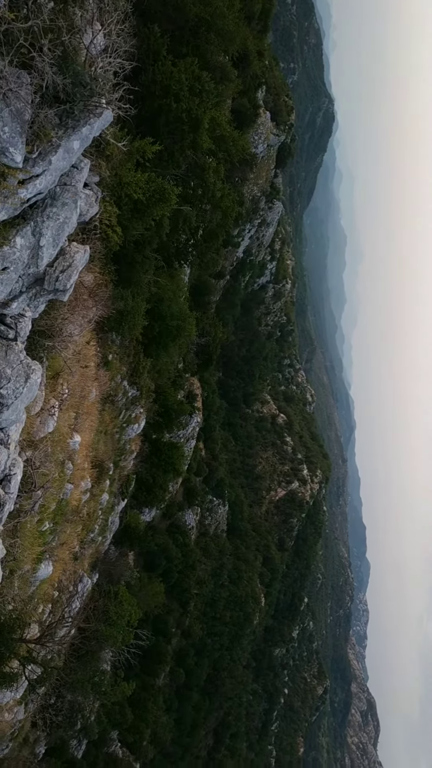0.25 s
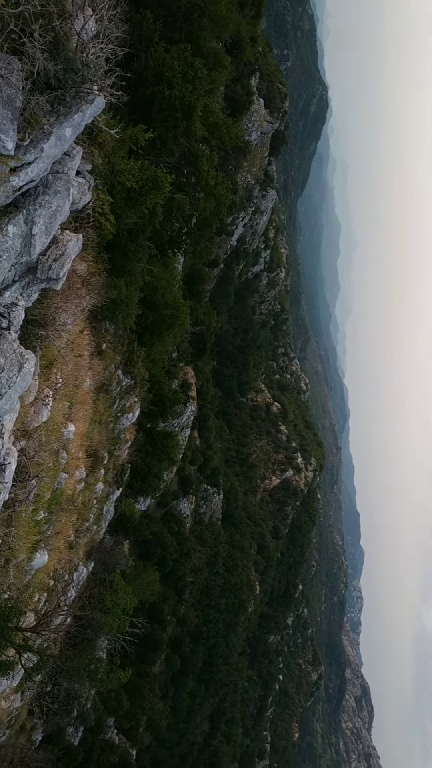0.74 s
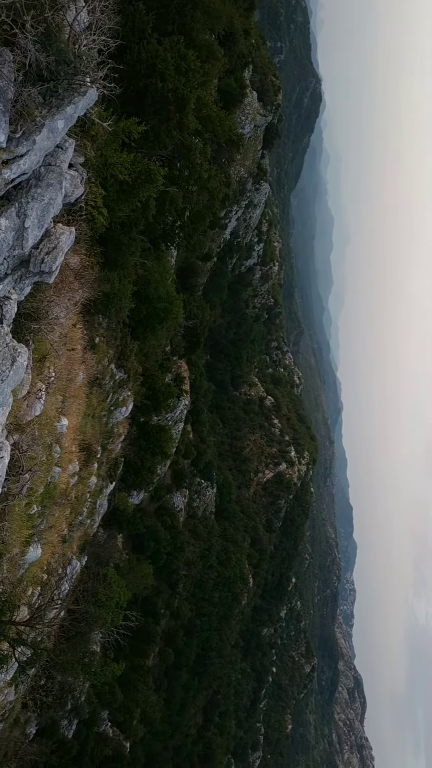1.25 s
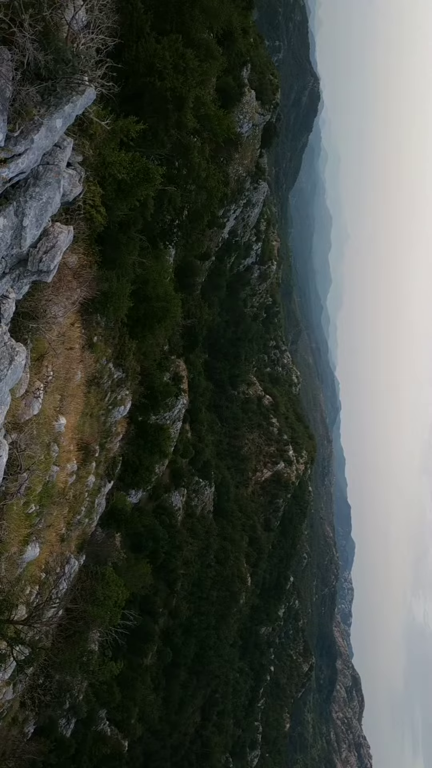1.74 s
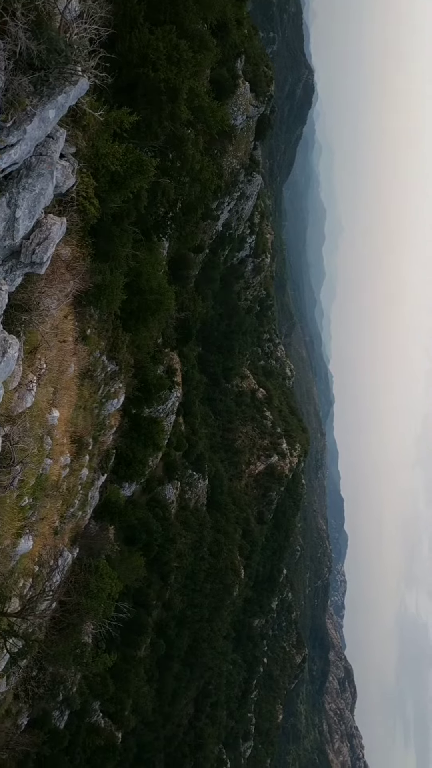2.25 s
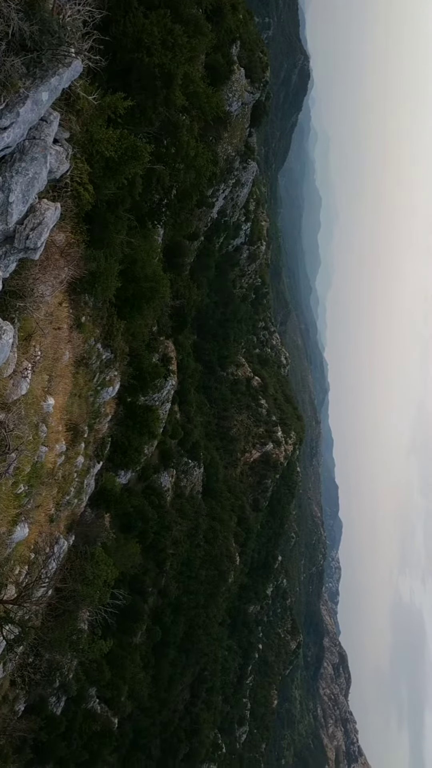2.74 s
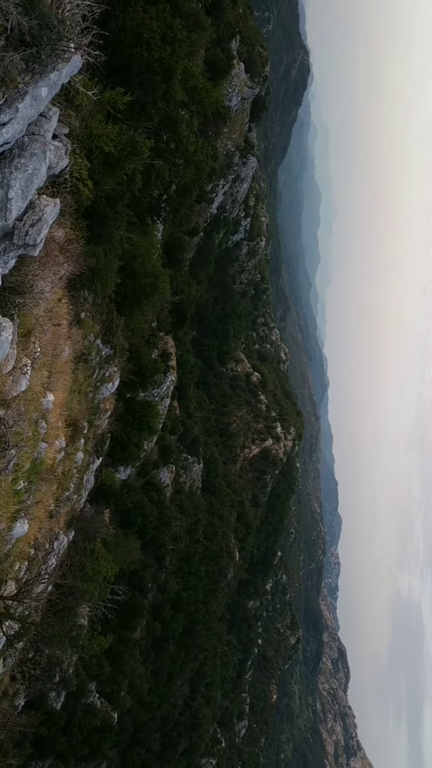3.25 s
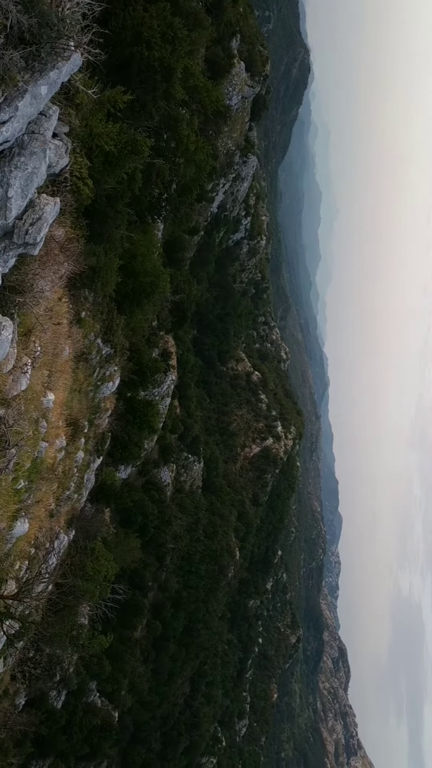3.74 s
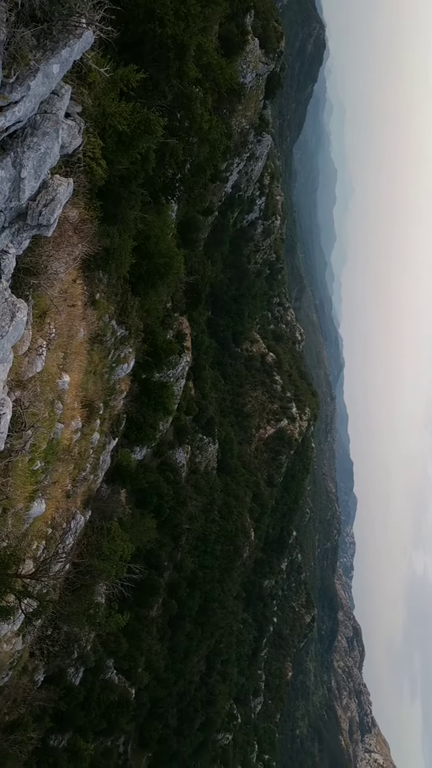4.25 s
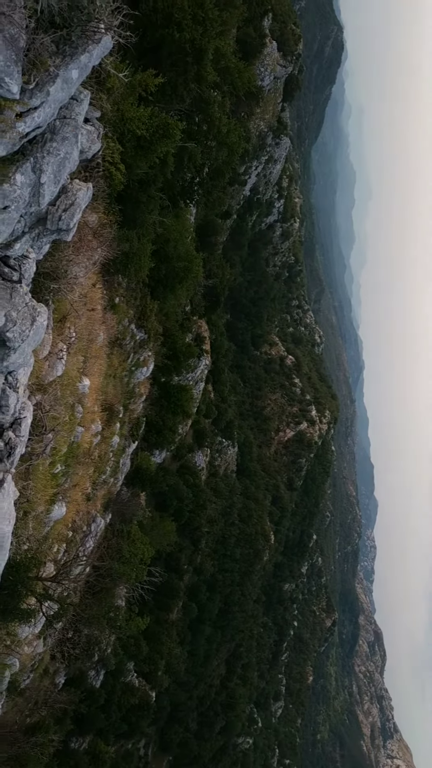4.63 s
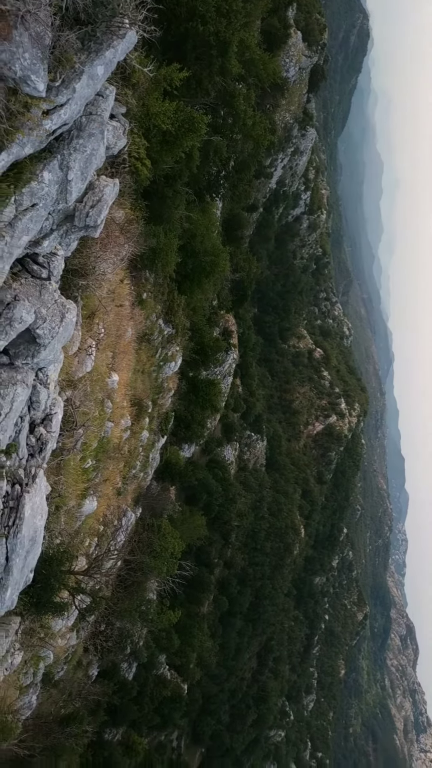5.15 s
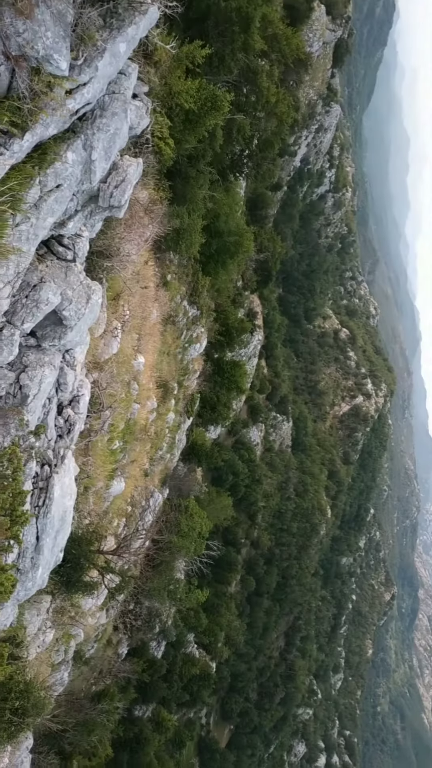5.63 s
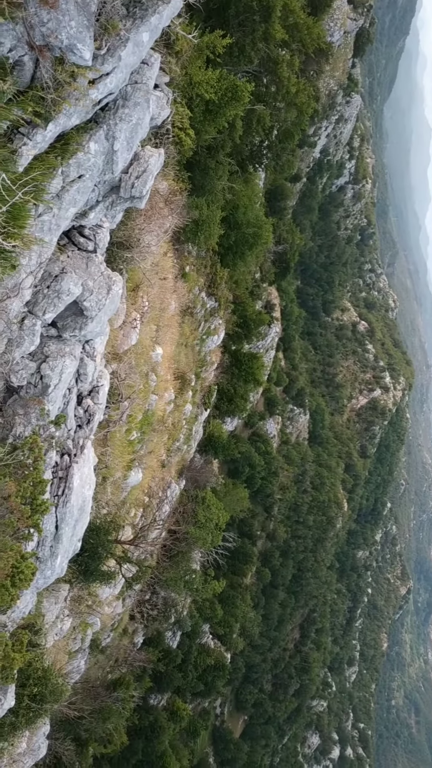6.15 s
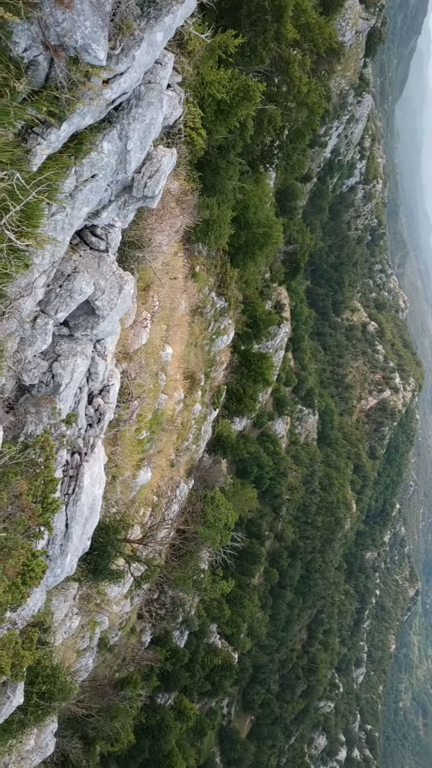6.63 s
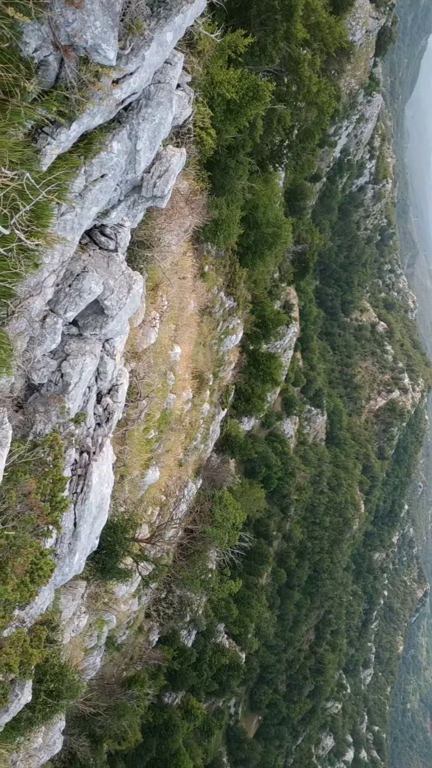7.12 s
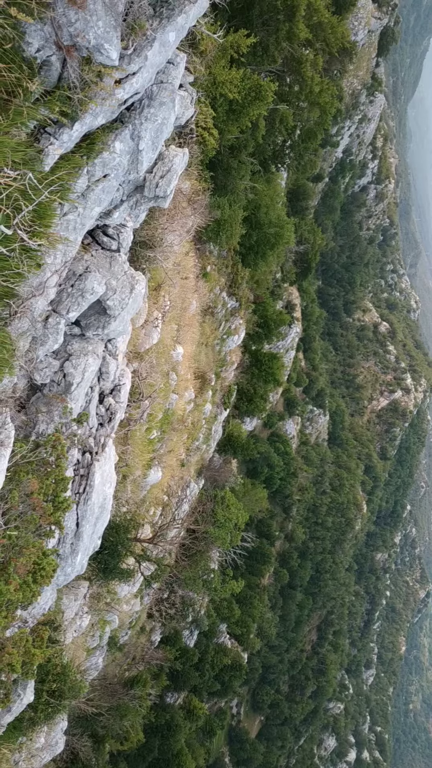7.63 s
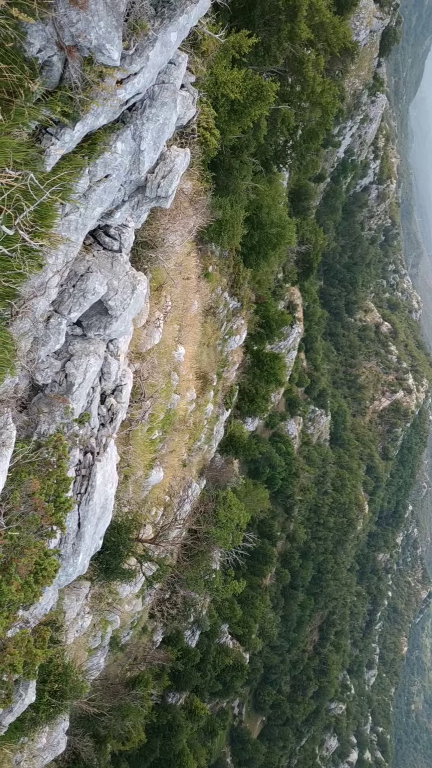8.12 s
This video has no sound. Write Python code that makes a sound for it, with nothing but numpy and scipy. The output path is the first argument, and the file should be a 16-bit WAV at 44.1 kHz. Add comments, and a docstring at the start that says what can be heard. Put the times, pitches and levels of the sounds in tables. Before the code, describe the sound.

Quiet open air over a wooded valley, heard through a hand-held phone. From the very start a hound bays below, each short cry a clear yelp breaking into a hoarse, rising and falling voice, with brief squeals and dropping whimpers in between. Thin, faint bird whistles slide downward in the first second. At about 0.7 s a harsher, louder dog joins, and the two overlap at a few cries a second, answered by quick echoes from rock and a short tail from the trees. Around 2.2-2.4 s fingers rub and make sharp clicks and bumps on the case, the strongest at 2.3 s. Barking stays lively through 4-5 s, with softer rubbing and small knocks around 4.7-5.7 s. From about 6 s the dogs are clearly farther off, duller and more washed in echo. A small tick comes near 7.2 s, and faint distant barks continue to the end at about 8.4 s.

```python
"""From a rocky ledge over a wooded valley: quiet air, already with a hound baying below and a bird slurring faintly.
Each bay is a clear yelp breaking into a hoarse, arching voice an octave lower; clear squeals and whimpers join it.
A harsher hound soon barks too. Trees and rock faces return both, from delayed noise and distinct echoes.
From about two seconds fingers rub, tick and bump on the phone: shaped noise, sharp cracks and sinking rings.
The hounds run off, fainter, while more of their sound comes back from the slopes."""
import sys
import numpy as np
from scipy import signal
from scipy.fft import rfft, irfft, next_fast_len
from scipy.io import wavfile
from scipy.ndimage import uniform_filter1d

SR = 44100
rng = np.random.default_rng(int(sys.argv[2]) if len(sys.argv) > 2 else 0)


def bounce(signal):
    """Save signal as a 16-bit WAV file at the path given by the first command-line argument."""
    frames = np.transpose(np.atleast_2d(signal))
    limited = np.clip(frames, -1, 1)
    pcm = np.round(limited * 32767).astype(np.int16)
    wavfile.write(sys.argv[1], SR, pcm)


N = 369558
TIME = np.arange(N) / SR

# Air over the ledge. Each row: frequency in Hz, relative spectrum level in dB.
AIR_SPECTRUM = [(18, -63), (30, -42), (53, -23), (92, -30), (202, 4), (518, -3), (830, -1), (1080, -5),
                (1470, -5.5), (1910, -9.5), (2240, -7.5), (2830, -11), (4310, -15), (11300, -14),
                (15500, -14.5)]
AIR_DB = -57  # level about which the air swells

# Cries of the baying hound. Each row: start in seconds, length in seconds, yelp length in seconds, release in
# seconds, start pitch in Hz, top pitch in Hz, bend of the rise (1 straight, more = earlier), place of the top
# (0-1, used up to .95), share of pitch lost after it, yelp level in dB, hoarse level in dB, hoarseness (0-1),
# treble in dB, bass in dB, swell after the break in dB.
BAYS = [ (-.09, .12, 0.014, 0.0042, 857, 1243, 2.1, .9, 0.027, -38, -32, 0.93, 6.5, -2, 3),
        (.236, 0.12, 0.0237, 0.0053, 713, 1147, 1, .42, 0.027, -32, -35, 0.7, -3.5, -2.5, 0.91),
        (.533, .122, 0.025, 0.032, 779, 1190, 1.9, 0.81, 0.038, -29, -33, 0.62, 2.5, 1, 4.8),
        (.95, 0.11, 0.014, 0.013, 814, 1167, 1.05, 0.83, 0.036, -40.5, -38, 0.63, 3.5, -8, 3.8),
        (1.563, .17, 0.017, 0.15, 871, 1196, 2.37, 0.78, 0.081, -39, -37, 0.6, 5, -7, 4.9),
        (2.01, 0.13, 0.02, 0.037, 749, 1219, 1.47, 0.83, 0.076, -39, -35.5, .52, -0.5, 0, 12.3),
        (2.98, .12, 0.037, .04, 1051, 1265, 1.08, 0.92, .067, -61, -38, 0.62, 5.5, 4.5, 3),
        (3.597, 0.14, 0.014, 0.029, 814.6, 1236, 1, 0.97, 0.092, -45, -40.5, 0.77, 5, 7.5, 3.5),
        (4.025, 0.13, .024, 0.077, 787.4, 1146, 1.64, 0.76, .1, -34.5, -36.5, 0.6, 1, 2, 3.5),
        (4.869, 0.2, 0.031, 0.066, 783, 1259, 1.01, 0.83, 0.18, -31, -35, 0.63, 3, 3.5, 4.9),
        (5.426, .115, 0.0083, 0.0084, 856, 1202, 1.5, 0.92, 0.03, -41, -38, .45, -5.5, 2, 11),
        (5.928, 0.12, .015, 0.025, 854, 1173, 1.8, 0.69, 0.048, -46.5, -48, 0.55, 2.5, 5.5, 5.6),
        (6.653, .13, 0.018, 0.026, 933, 1195, 1.17, 0.91, 0.055, -46, -55, 0.64, 1, 1, 2),
        (7.244, 0.18, 0.0066, 0.027, 1013, 1214, 1.9, 0.48, 0.063, -53, -56, 0.44, 16, 7, 4.2),
        (7.653, 0.11, 0.0085, 0.026, 1022, 1179, 1.87, 0.61, 0.054, -58.5, -49.5, 0.6, 9, -2.5, 12),
        (8.338, 0.078, .01, .023, 1030, 1200, 1.9, 0.86, .1, -56, -56, 0.55, 3, -2, 3), ]
# Cries of the barking hound. Each row: the same columns, in the same units, as the bays.
BARKS = [ (.732, .11, 0.044, 0.025, 684.4, 786, 3.19, 0.71, 0.052, -25.5, -31.5, .72, 2, 0, 1.9),
         (1.187, 0.14, 0.0434, 0.12, 761.7, 904.4, 1.62, 0.74, 0.043, -24.5, -29, 0.45, -0.5, -6, 1.8),
         (1.658, 0.095, 0.024, 0.014, 735, 988, 1.15, 0.81, .039, -26, -36.5, 0.97, 7, -3.5, 1.2),
         (2.459, .16, 0.045, 0.14, 747.4, 984, 0.84, 0.64, 0.059, -29.5, -31.5, 0.71, 8, 2.5, 5.2),
         (2.914, 0.15, 0.029, 0.12, 802, 1028, 1.36, 0.75, 0.02, -26.5, -34, 0.76, 0, 0, 2.2),
         (4.06, 0.12, 0.024, 0.0092, 740, 993, 1.65, 0.57, 0.276, -33.5, -35, .55, 5, -0.5, 3.2),
         (4.453, 0.12, 0.017, .033, 720, 958.5, 1.66, 0.5, 0.23, -34, -32.5, .78, 5, -0.5, 0.66),
         (5.282, 0.14, 0.024, .11, 824, 977, 2.7, 0.61, .05, -43.5, -37, 0.73, 11.5, 7, 5.2),
         (5.687, .11, .031, 0.023, 743, 968.6, 1.66, 0.75, 0.056, -32.5, -36, .76, 6.5, 7, 9),
         (6.095, .12, .037, 0.053, 765.5, 998, 1.6, .78, 0.047, -40, -44.5, .55, 7.5, 5, 2.4),
         (6.503, 0.14, 0.029, 0.058, 778, 1019, 1.27, 0.47, 0.038, -44, -45.5, 0.61, -3, 0.5, 2.7),
         (6.904, 0.12, 0.034, 0.018, 823, 937.4, 1.96, 0.44, 0.054, -41.5, -45, 0.73, -0.5, -7.5, 2.5),
         (7.723, .15, 0.0524, 0.017, 831.5, 952, 1.9, 0.53, 0.145, -54, -51.5, .66, 2, 0, 3.4),
         (8.062, .2, 0.035, 0.15, 799, 1012, 1.67, 0.47, 0.014, -47, -51.5, 0.4, 1.5, -10, 3), ]
# Throat and mouth as heard through the air. Each row: frequency in Hz, gain in dB.
BAY_THROAT = [(200, -63), (470, -9.5), (570, 8.5), (850, 13), (1150, 4), (1450, 12.5), (1750, 2),
              (2020, 0.5), (2300, 3), (2500, -4.5), (2780, -16), (3800, 5.5), (5500, -32)]
BARK_THROAT = [(200, -99), (470, -14), (690, 5), (900, 6), (1200, -4), (1600, -1), (1980, -7.5), (2250, -8),
               (2750, -17), (3800, -9), (5500, -52)]
# Clear squeals of the baying hound. Each row: start in seconds, length in seconds, lowest pitch in Hz,
# place of the lowest pitch (0-1), level in dB.
SQUEALS = [(.003, 0.07, 1203, 0.39, -27), (0.342, .11, 1154, 0.84, -31.5), (3.328, .11, 1209, 0.44, -34.5),
           (3.729, .11, 1167, .5, -33.5), (7.345, .165, 1265, 0.7, -55)]
# Falling whimpers of the baying hound. Each row: start in seconds, length in seconds, top pitch in Hz, level in dB.
WHIMPERS = [(0.445, 0.028, 962, -37.5), (0.646, 0.028, 1550, -41), (.835, 0.03, 890, -37.5),
            (1.053, 0.047, 1450, -48), (1.272, 0.023, 966, -31.5), (3.704, 0.024, 1520, -41.5),
            (3.821, 0.022, 880, -37.5), (4.554, 0.029, 890, -36)]
# The hounds' way off. Each row: time in seconds, sound sent to the slopes in dB,
# gain of the middle of the voice, around 1080 Hz, in dB.
TRAIL = [(0, -6.5, -2), (2.5, -1, 8.5), (5, -6, 3.5), (6.2, 6.5, 0.5), (7.2, 7.5, -0.5), (8.38, 10, -5.5)]

# Each hound's folds: pitch of the second tone with the jaw open in Hz, its strength, how hard it chops the flow,
# strength of the half lines, overtones gained by pressing, overtones of a clear note in dB.
BAY_VOICE = dict(second_hz=833.6, second=.3, coupling=.42, split=.52, press=.46, overtone_db=-17)
BARK_VOICE = dict(second_hz=701, second=0.69, coupling=0.88, split=0.65, press=0.16, overtone_db=-11.5)
BAY_YELP_HOARSE, BARK_YELP_HOARSE = 0.16, 0.055
SPLIT_HOARSE = 0.59  # hoarseness at which the strong-weak cycles are fully formed
RASP, JITTER = .48, .04  # breath noise and pitch jitter added at full hoarseness (shares)
UNEVEN_DB, SHAKE_DB = 3.3, 1.3  # flicker of overtones and second tone; flicker of the whole voice
SECOND_SAG = 0.1018  # share by which the second tone stands higher with the jaw shut
JAW_SHUT, JAW_WIDE = 0.017, 0.007  # shares by which the resonances sink and rise
SHUT_TREBLE_DB = -3  # nearly closed lips dull the voice
GROWL_HZ, GROWL = 189.74, .65  # mean rate and full depth at which slack throat flesh flutters the hoarse voice
BREAK_S, BREAK_CHAOS, SETTLE_S = 0.012, 0.33, 0.036  # time of the break, extra hoarseness then, its decay time
RECOVER_S = 0.038  # time in which the voice swells again after the break
SQUEAL_BEND = 0.0758  # share by which pitch stands higher half a length away from the trough
SQUEAL_HOARSE, SQUEAL_TAPER, SQUEAL_TREBLE_DB = 0.0027, 0.57, -2  # taper is the power of the level arch
WHIMPER_TOP_S, WHIMPER_OCTAVE_S = 0.0081, 0.034  # time to the top, time from there to an octave lower
WHIMPER_HOARSE = 0.19
# Breath in the throat. Each row: frequency in Hz, relative level in dB.
BREATH_SPECTRUM = [(1000, 6), (2500, -9.0), (8000, -77)]

# Distinct returns from rock faces. Each row: delay in seconds, level against the tree tail in dB.
ECHOES = [(0.115, -9), (0.162, -15.5)]
ECHO_SPREAD_S = .007
# How the valley colours what it returns. Each row: frequency in Hz, gain in dB.
VALLEY_SPECTRUM = [(500, -13.5), (900, -8.5), (1600, -10.0), (2400, -6.5), (5000, 13)]
# Hounds and echoes at the two microphones. Each row: frequency in Hz, lead of the left in radians.
MICROPHONE_PHASE = [(500, 0.0091), (850, -0.22), (1200, -0.65), (1700, -1.25), (2600, -0.87)]

# Bird slurs. Each row: start in seconds, length in seconds, start pitch in Hz, end pitch in Hz, level in dB.
SLURS = [(0.071, 0.073, 4760, 3260, -57.5), (0.203, 0.057, 3650, 3300, -64),
         (.257, 0.083, 4860, 3030, -57.5), (0.884, 0.084, 3380, 3040, -65), (1.065, 0.088, 2900, 3080, -64),
         (2.886, 0.065, 5800, 3280, -65), (3.119, .087, 4780, 3000, -66), (6.856, 0.07, 9400, 8200, -76)]

# Skin rubbing on the case as the grip shifts. Each row: time in seconds, level in dB about which the rub flickers.
GRIP = [(2.1, -80), (2.3, -53), (2.43, -66), (2.56, -65), (2.9, -72), (4.4, -73), (4.71, -64), (4.77, -57),
        (4.87, -67), (5.1, -61), (5.26, -65), (5.35, -53.5), (5.43, -66), (5.56, -66), (5.63, -58.5),
        (5.72, -65)]
# Colour of the rub. Each row: frequency in Hz, relative level in dB.
RUB_SPECTRUM = [(100, -23), (500, 3), (3000, -11), (6500, -9.0), (15000, -13)]
# Finger ticks on the case. Each row: start in seconds, peak in dB before panning and the bass cut,
# ring in milliseconds, left minus right in dB.
TICKS = [(2.205, -34, 0.75, -13), (2.3116, -5.5, 0.59, -5.5), (2.363, -27, 1.3, -23),
         (2.367, -14, 0.67, -22), (2.386, -25, 0.76, -25), (2.91, -39, .6, -16), (3.553, -32, 0.51, 2),
         (4.02, -29.5, 0.67, -11), (4.589, -35, 0.41, -20), (5.169, -39, .61, 12), (7.187, -27, 2.8, 7.5)]
# Colour of a tick. Each row: frequency in Hz, gain in dB.
TICK_SPECTRUM = [(300, -18), (1600, -2), (3200, 4), (9000, -1), (15000, -7)]
# Bumps of the hand. Each row: start in seconds, level in dB before panning and the bass cut,
# starting ring in Hz, decay in milliseconds, left minus right in dB.
BUMPS = [(2.312, -21, 1435, 1.05, -25.5), (2.3149, -32, 446, 0.69, 26), (2.3684, -16.5, 1070, 0.28, -19),
         (2.3839, -23.5, 924, 4, -25), (5.169, -28.5, 1630, 0.32, 23), (5.375, -41.5, 560, 4.2, 21),
         (5.729, -40.5, 348, 8, -20), (6.99, -53.5, 420, 10, 19), (7.191, -38.5, 2770, 1.6, 8)]
CASE_LAG_S = .0003  # a touch reaches the farther microphone this much later
TOP_HZ = 15700  # upper limit of the phone


def undb(db):
    """Decibels to gain."""
    return 10 ** (np.asarray(db) / 20)


def unit(x):
    """Scale to an rms of 1."""
    return x / np.sqrt(np.mean(x ** 2))


def colour(x, points):
    """Filter by a spectrum of (Hz, dB) points, joined along log frequency."""
    hz, db = np.transpose(points)
    n = x.shape[-1]
    size = next_fast_len(n + 1024)
    bins = np.maximum(np.fft.rfftfreq(size, 1 / SR), 1)
    gain = undb(np.interp(np.log(bins), np.log(hz), db))
    return irfft(rfft(x, size) * gain, size)[..., :n]


def wander(n, rate):
    """Smooth chance with a spread near 1 that changes about rate times a second."""
    return signal.resample(rng.standard_normal(int(n / SR * rate) + 2), n)


def ease(x):
    """A quarter sine from 0 to 1 that then holds."""
    return np.sin(np.pi / 2 * np.clip(x, 0, 1))


def tone(hz):
    """A sine that follows a moving pitch."""
    return np.sin(2 * np.pi * np.cumsum(hz) / SR)


def add(out, sound, start, pan_db=0, lag_s=0):
    """Mix a sound into both channels at a time; the weaker side may get it later."""
    for channel, db in enumerate((pan_db / 2, -pan_db / 2)):
        i = int((start + lag_s * (db < 0)) * SR)
        skip, stop = max(-i, 0), min(len(sound), N - i)
        out[channel, i + skip:i + stop] += undb(db) * sound[skip:stop]


def air(swell_db=0.67):
    """Far wind in the valley: broad noise, separate at each microphone, that swells slowly."""
    wind = unit(colour(rng.standard_normal((2, N)), AIR_SPECTRUM))
    return wind * undb(AIR_DB + swell_db * wander(N, 1.1))


def hounds():
    """Both dogs, down the slope; the barker is the harsher one."""
    out = np.zeros((2, N))
    bays = [cry(row, BAY_YELP_HOARSE) for row in BAYS]
    whines = [squeal(*row) for row in SQUEALS] + [whimper(*row) for row in WHIMPERS]
    barks = [cry(row, BARK_YELP_HOARSE) for row in BARKS]
    for calls, throat, folds in ((bays + whines, BAY_THROAT, BAY_VOICE), (barks, BARK_THROAT, BARK_VOICE)):
        for t, *controls in calls:
            add(out, voice(t, *controls, throat, **folds), t[0])
    return out


def cry(row, yelp_hoarse):
    """Controls of a cry: a yelp swells and breaks, then the hoarse voice arches in pitch and lets go."""
    (start, length, yelp_s, release_s, from_hz, top_hz, bend, top_at, sag,
     yelp_db, body_db, hoarseness, treble_db, bass_db, swell_db) = row
    t = np.arange(0, length, 1 / SR)
    top_at = min(top_at, .95)
    past_top = np.maximum(t / length - top_at, 0) / (1 - top_at)
    before_top = np.maximum(1 - t / length / top_at, 0)
    rise_hz = top_hz - (top_hz - from_hz) * before_top ** bend
    hz = rise_hz * (1 - sag * past_top ** 2)
    broken = ease((t - yelp_s) / BREAK_S + .5) ** 2
    since = np.maximum(t - yelp_s, 0)
    yelp = undb(yelp_db) * ease(t / yelp_s)
    body = undb(body_db - swell_db * np.exp(-since / RECOVER_S))
    release = ease((length - t) / release_s)
    gain = ((1 - broken) * yelp + broken * body) * release
    body_hoarse = hoarseness + BREAK_CHAOS * np.exp(-since / SETTLE_S)
    hoarse = (1 - broken) * yelp_hoarse + broken * body_hoarse
    return start + t, hz, gain, hoarse, treble_db, bass_db


def voice(t, hz, gain, hoarse, treble_db, bass_db, throat,
          second_hz, second, coupling, split, press, overtone_db):
    """With hoarseness, clear folds fall into strong-weak cycles and a second tone sounds against them."""
    n = len(t)
    hoarse = np.clip(hoarse, 0, 1)
    chaos = hoarse ** 3
    opening = np.sin(np.linspace(0, np.pi, n))  # the jaw opens and closes
    drift = (.004 + .011 * hoarse) * wander(n, 90) + JITTER * chaos * wander(n, 600)
    phase = 2 * np.pi * np.cumsum(hz * (1 + drift)) / SR

    # a clear yelp is nearly a sine; pressing adds overtones, and weak alternate cycles add the half lines
    folds = np.sin(phase)
    for k in (.5, 1.5, 2, 2.5, 3, 3.5, 4):
        if k % 1:
            size = split * ease(hoarse / SPLIT_HOARSE) ** 2
        else:
            size = undb(overtone_db) + press * hoarse
        flicker = undb(UNEVEN_DB * hoarse * wander(n, 50))
        line = np.sin(k * phase + rng.uniform(0, 2 * np.pi))
        folds = folds + size / max(k - 1, 1) * flicker * line

    # loose tissue rings at its own pitch and chops the flow, which adds sum and difference tones
    own_drift = .04 * wander(n, 35) + .07 * hoarse * wander(n, 500)
    own_hz = second_hz * (1 + SECOND_SAG * (1 - opening) + own_drift)
    flap = hoarse ** 2 * undb(UNEVEN_DB * wander(n, 40)) * tone(own_hz)
    folds = folds * (1 + 2 * coupling * flap) + 2 * second * flap
    flutter = tone(GROWL_HZ * (1 + .25 * wander(n, 200)))
    folds = folds * (1 + GROWL * hoarse ** 2 * flutter)

    # the hiss of breath is strongest once in every two cycles of the folds
    turbulence = unit(colour(rng.standard_normal(n), BREATH_SPECTRUM))
    folds += (0.017 + RASP * chaos) * turbulence * (1 + 2 * np.sin(phase / 2))

    # the resonances rise as the jaw opens and sink as it closes
    shut = colour(folds, np.array(throat) * [1 - JAW_SHUT, 1])
    shut = colour(shut, [(1000, 0), (2400, SHUT_TREBLE_DB)])
    wide = colour(folds, np.array(throat) * [1 + JAW_WIDE, 1])
    mouth = shut + opening * (wide - shut)

    # the path over the ground lifts or lowers the middle of the voice along the trail; the air takes the top
    middle_db = np.interp(t[0], *np.transpose(TRAIL)[::2])
    path = [(620, middle_db / 4 + bass_db), (850, middle_db / 2), (1080, middle_db), (1500, treble_db),
            (2750, treble_db / 2 + 2), (3200, -9), (3800, -21)]
    sound = colour(mouth, path)
    level = np.sqrt(uniform_filter1d(sound ** 2, size=500) + 1e-9)
    shake = undb(SHAKE_DB * hoarse * wander(n, 110))
    return gain * shake * sound / level


def squeal(start, length, low_hz, low_at, db):
    """A clear note that slides into a shallow trough, near which it is loudest, and flicks up again."""
    u = np.linspace(0, 1, int(length * SR))
    hz = low_hz * (1 + SQUEAL_BEND * (2 * (u - low_at)) ** 2)
    swell = ease(np.interp(u, [0, np.clip(low_at, .1, .9), 1], [0, 1, 0]))
    gain = undb(db) * swell ** SQUEAL_TAPER
    return start + u * length, hz, gain, SQUEAL_HOARSE, SQUEAL_TREBLE_DB, 0


def ports(x):
    """The two microphones pick up the same wave a little out of step, each turned by half the phase."""
    hz, radians = np.transpose(MICROPHONE_PHASE)
    size = next_fast_len(N + 1024)
    bins = np.maximum(np.fft.rfftfreq(size, 1 / SR), 1)
    turn = np.interp(np.log(bins), np.log(hz), radians)
    sides = np.array([[1], [-1]])
    return irfft(rfft(x, size) * np.exp(.5j * turn * sides), size)[:, :N]


def valley(x, t60=0.51, build_s=0.015, side=0.05):
    """Trees scatter a long tail that takes a moment to build; rock faces return distinct echoes."""
    t = TIME[:int(1.5 * SR)]
    power = np.exp(-2 * np.log(1000) * t / t60) * (1 - np.exp(-t / build_s))
    power /= power.sum()
    for delay, db in ECHOES:
        blur = np.exp(-((t - delay) / ECHO_SPREAD_S) ** 2)
        power += undb(db) ** 2 * blur / blur.sum()
    middle, wide = rng.standard_normal((2, len(t))) * np.sqrt(power)
    stereo = middle + side * np.array([[1], [-1]]) * wide
    response = colour(stereo, VALLEY_SPECTRUM)
    sent = x * undb(np.interp(TIME, *np.transpose(TRAIL)[:2]))
    return signal.fftconvolve(sent[None], response, axes=1)[:, :N]


def bird():
    """Thin, slightly unsteady whistles, most of them sliding down in pitch."""
    out = np.zeros((2, N))
    for start, length, from_hz, to_hz, db in SLURS:
        u = np.linspace(0, 1, int(length * SR))
        hz = from_hz * (to_hz / from_hz) ** u + 40 * wander(len(u), 700)
        swell = np.sqrt(abs(np.sin(np.pi * u))) * (1 - u / 2)
        add(out, undb(db) * swell * tone(hz), start)
    return out


def whimper(start, length, top_hz, db):
    """The folds clear and slacken as the push ends, so the note tips over and drops ever faster."""
    t = np.arange(0, length, 1 / SR)
    gain = undb(db) * np.sqrt(abs(np.sin(np.pi * t / length)))
    hz = top_hz * 2 ** -(((t - WHIMPER_TOP_S) / WHIMPER_OCTAVE_S) ** 2)
    return start + t, hz, gain, WHIMPER_HOARSE, 0, 0


def grip_rub():
    """Skin slides on the case: soft noise with a quick uneven flicker."""
    rub = unit(colour(rng.standard_normal((2, N)), RUB_SPECTRUM))
    return rub * undb(np.interp(TIME, *np.transpose(GRIP)) + 2.4 * wander(N, 120))


def handling():
    """Touches on the case reach the microphones with their lowest bass cut."""
    cut = signal.butter(4, 140, "high", fs=SR, output="sos")
    return signal.sosfilt(cut, finger_ticks() + hand_bumps())


def finger_ticks():
    """One sharp contact, then a brief noisy rattle of the case, mostly near one microphone."""
    out, t = np.zeros((2, N)), TIME[:4096]
    lead = 32  # samples of room for the filter's ring ahead of the contact
    for start, db, ring_ms, pan_db in TICKS:
        decay = np.exp(-t * 1000 / ring_ms) + undb(-14.5) * np.exp(-t / 0.0048)
        crack = 0.22 * rng.standard_normal(len(t)) * decay
        crack[0] = 2
        crack = colour(np.pad(crack, (lead, 0)), TICK_SPECTRUM)
        add(out, undb(db) * crack / abs(crack).max(), start - lead / SR, pan_db, CASE_LAG_S)
    return out


def hand_bumps():
    """The high part of a knock dies first, so its ring sinks to that of the whole case."""
    out, t = np.zeros((2, N)), TIME[:4096]
    for start, db, hz, decay_ms, pan_db in BUMPS:
        sink = .3 + .7 * np.exp(-t / .0016)
        decay = np.exp(-t * 1000 / decay_ms)
        add(out, undb(db) * decay * tone(hz * sink), start, pan_db, CASE_LAG_S)
    return out


def scene():
    """Air on the ledge, dogs and bird with their echoes, and the hand on the phone."""
    dogs, slurs = hounds(), bird()
    echoes = valley(dogs[0] + undb(-9) * slurs[0])
    return air() + ports(dogs + echoes) + slurs + grip_rub() + handling()


def record(dry):
    """The phone cuts the top with a steep low-pass."""
    return signal.sosfilt(signal.ellip(8, .2, 70, TOP_HZ, fs=SR, output="sos"), dry)


dry = scene()
out = record(dry)
bounce(out)
```